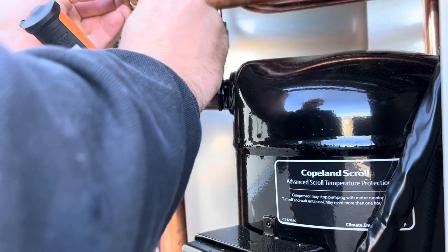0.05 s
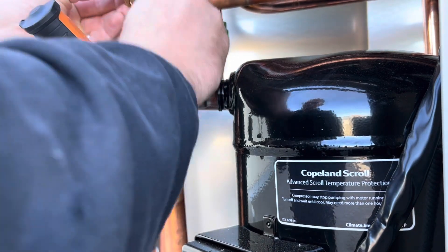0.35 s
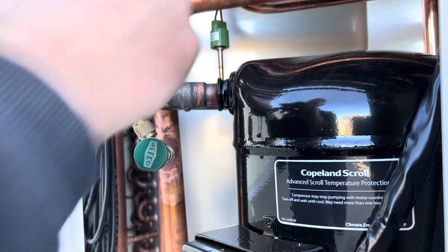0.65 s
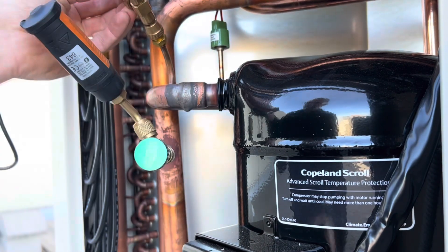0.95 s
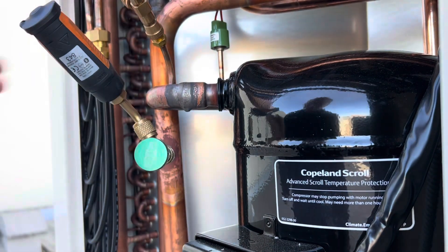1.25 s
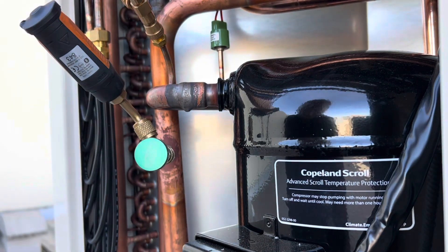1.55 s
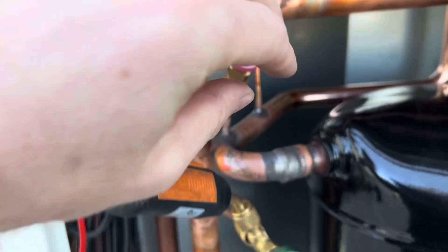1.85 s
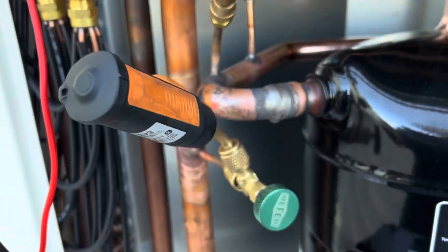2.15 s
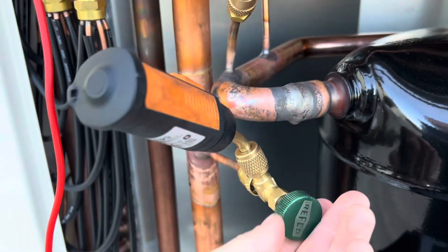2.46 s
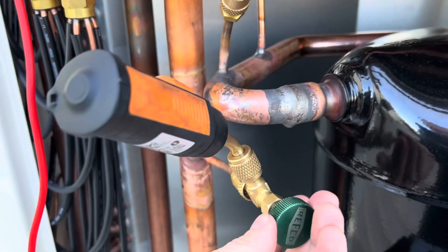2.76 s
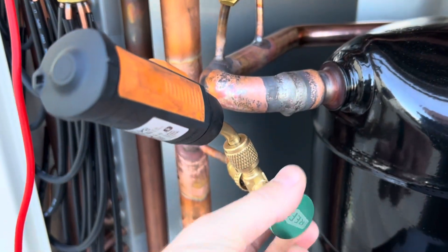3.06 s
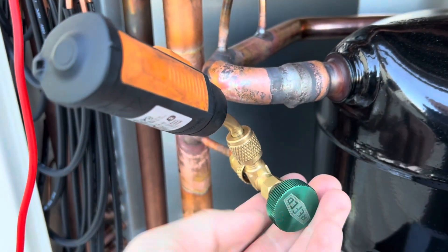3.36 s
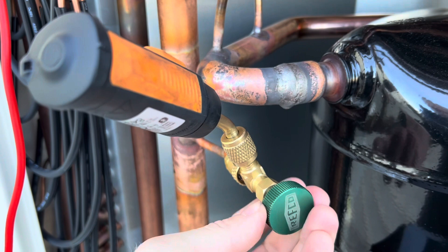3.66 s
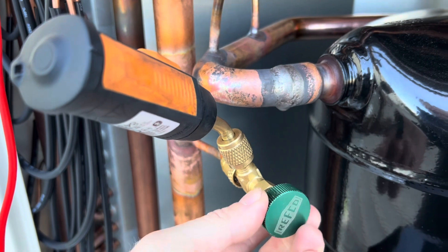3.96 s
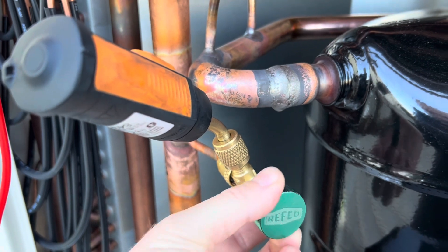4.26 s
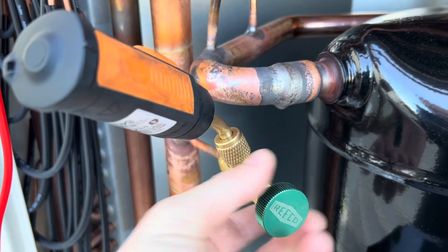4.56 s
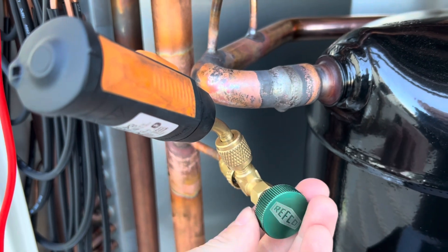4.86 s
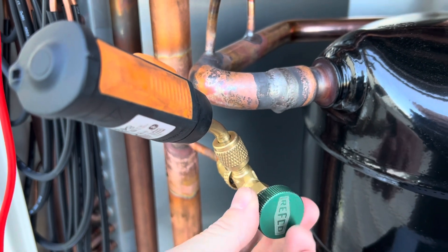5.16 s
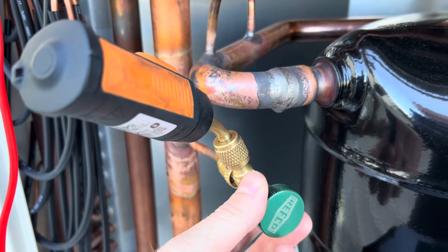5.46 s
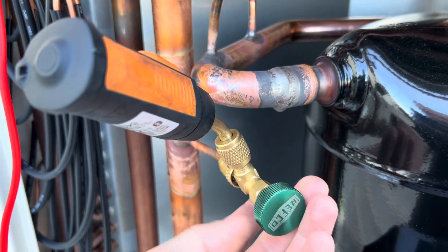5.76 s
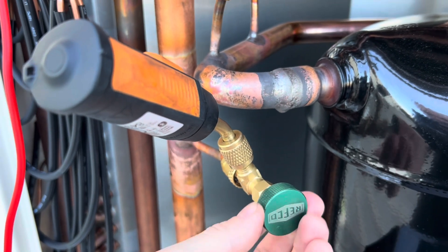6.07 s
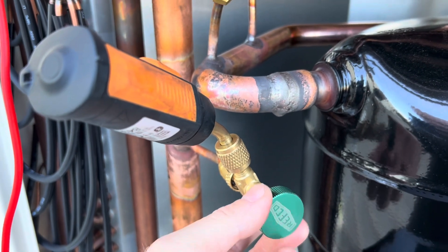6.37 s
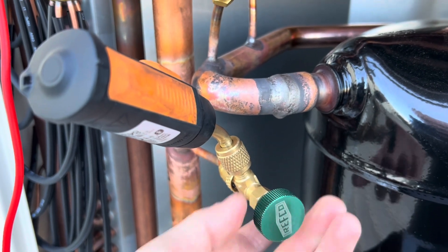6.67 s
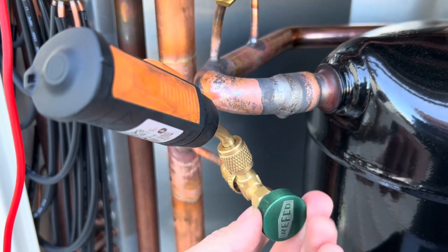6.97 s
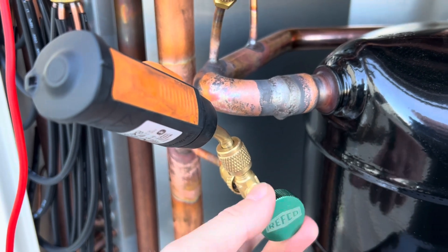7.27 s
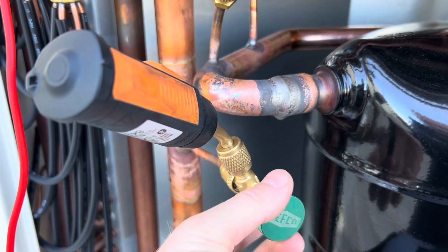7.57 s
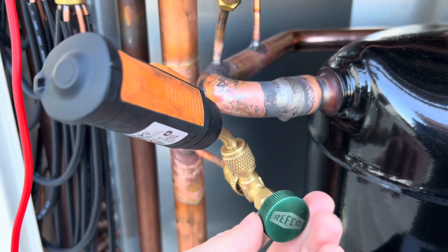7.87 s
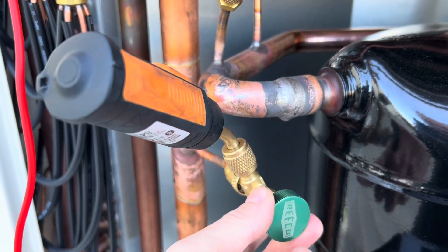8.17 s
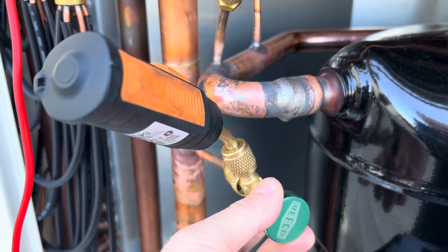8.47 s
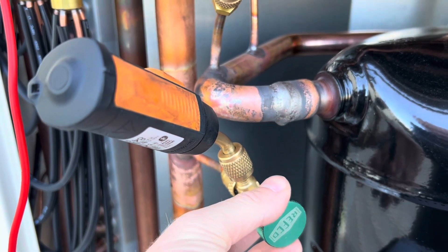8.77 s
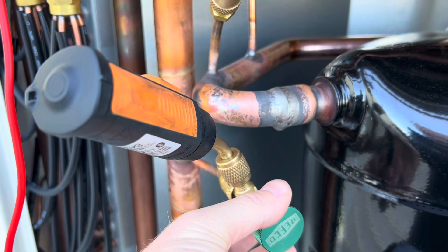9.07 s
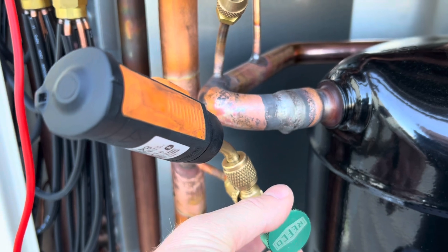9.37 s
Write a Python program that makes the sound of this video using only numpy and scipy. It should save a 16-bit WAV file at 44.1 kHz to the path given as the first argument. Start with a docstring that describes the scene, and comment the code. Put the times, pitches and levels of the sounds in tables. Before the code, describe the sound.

Steady compressor drone over rushing air, with dull handling knocks and brief squeaky hisses of gas as a valve knob is turned.

```python
"""At an open air conditioner cabinet, a scroll compressor runs steadily. Its periodic gas pulses and clacks
make a hum with one harmonic per multiple of the shaft speed, over the turbulent rush of gas and air.
The sound dips briefly and goes on from a closer spot. Hands bump about near the microphone,
and a few spurts of gas hiss and squeal out while a valve knob is screwed in."""
import sys
import numpy as np
from scipy import signal
from scipy.fft import rfft, irfft, next_fast_len
from scipy.io import wavfile

SR = 44100
rng = np.random.default_rng(int(sys.argv[2]) if len(sys.argv) > 2 else 0)


def pcm_store(signal):
    """Save signal as 16-bit PCM."""
    levels = np.round(np.clip(np.atleast_2d(signal), -1, 1) * 32767)
    wavfile.write(sys.argv[1], SR, levels.astype(np.int16).T)


N = 414981
TIME = np.arange(N) / SR
FAR, NEAR = 1, 2   # listening spots, also their columns in the level tables
MOVE_S = 1.842   # the near spot takes over
WHITE = [(100, 0), (10000, 0)]   # flat spectrum: frequency_hz, density_db
# shaft speed: time_s, turns_per_s
SHAFT_SPEED = [(0, 48.81), (1.7, 48.81), (2.2, 48.76), (9.4, 48.75)]
# phase difference between the two microphone ports: frequency_hz, left_lead_rad
PORT_LEAD = [(100, 0), (520, -.25), (720, -.8), (1050, -.6), (1400, -1.4), (1900, 0), (4650, .2),
             (5500, -1.4), (6200, -.1), (7300, 0), (9000, -2.2), (10600, -3.8), (12500, -6.28), (15500, -9)]


def compressor(turns, spot, ring_width_hz=220, sizzle_per_s=18, diffuse_hz=1600, wander=.1):
    """A periodic force gives a harmonic series; amplitude modulation makes its lines sizzle and wander."""
    # shell resonances that each clack strikes with a strength of its own: centre_hz, swing_db
    shell_rings = [(2930, 1.5), (4630, 1.1), (5800, 1.7), (6260, 2.1)]
    hz = np.arange(1, 186) * SHAFT_SPEED[-1][1]
    rings = [np.exp(-((hz - centre) / ring_width_hz) ** 4) for centre, _ in shell_rings]
    # short waves bounce about the cabinet and arrive out of step; the shell rings scatter less
    diffuse = np.minimum(hz / diffuse_hz, 1)
    scatter_rad = 1.5 * np.sqrt(hz / diffuse_hz) * diffuse ** 4 * (1 - .6 * sum(rings))
    level_db, pan_db = shell_response(hz, spot)
    lines = from_db(level_db) * np.exp(1j * pulse_and_clack(hz, scatter_rad))
    lines = stereo_lines(lines, hz, pan_db, diffuse)
    shares = rng.standard_normal((2, len(hz)))
    out = repeat(lines, turns) + throb(lines, hz, turns)
    for ring, (_, swing_db) in zip(rings, shell_rings):
        sizzle = rms_one(from_db(swing_db * drift(sizzle_per_s)))
        out += (sizzle - 1) * repeat(lines * ring, turns)
    for harmonic, change_db in line_changes(spot):
        out += (from_db(change_db) - 1) * repeat(lines * (hz == hz[harmonic - 1]), turns)
    # moving hands shift the reflections, so each high line swells and fades in its own way
    for share in shares:
        out += drift(5.9) * repeat(lines * wander * diffuse ** 2 * share, turns)
    return out


def shell_response(hz, spot, pan_spread_db=2.4):
    """Resonance favours single harmonics: the base level and left-right balance of each, in dB."""
    # low harmonics: harmonic, far_db, near_db, near_pan_db
    hum = np.array([(1, -38, -29.5, 0), (2, -41, -43, 1), (3, -35, -31, 0), (4, -46, -49, -1),
                    (5, -32, -35, 1), (6, -51, -46, 4), (7, -38, -48.5, 3), (8, -38, -36, 0),
                    (9, -43.5, -37.5, 7), (10, -36.5, -34, 1), (11, -40, -37, 1), (12, -31.5, -31, -2),
                    (13, -34, -42, 0), (14, -40, -39.5, -1), (15, -40, -41, 0), (16, -46, -43, 4),
                    (17, -51, -51, 2), (18, -52, -47, 0), (19, -42, -40, 0), (20, -54, -45, 12),
                    (21, -46, -39, 3), (22, -50, -41, 2), (23, -41, -47, 9), (24, -53, -47, 0),
                    (25, -53, -53, -5), (26, -47, -40, -1), (27, -58, -49, 0), (28, -55, -55, 3),
                    (29, -57, -48, -5), (30, -51, -40.5, -4), (31, -56, -52, -3), (32, -54, -45.5, -4)])
    # shell and pipe modes that pick out higher harmonics: frequency_hz, far_db, near_db
    modes = [(1609, -56, -57), (1657, -52, -54), (1706, -52, -60), (1755, -50, -49), (1804, -60, -53.5),
             (1901, -56, -59), (1950, -49, -55.5), (1999, -53, -58), (2048, -56, -49), (2097, -63, -53),
             (2145, -54, -66), (2194, -50, -56), (2340, -62, -54), (2389, -58, -50), (2438, -55, -55),
             (2487, -53, -49), (2536, -66, -50), (2633, -61, -55), (2731, -55, -54), (2779, -50, -54),
             (2828, -52, -61), (2877, -64, -57), (2926, -58, -44.7), (2974, -59, -54), (3023, -53, -68),
             (3072, -56, -67), (3121, -57, -61), (3218, -61, -53), (3316, -57, -65), (3364, -60, -56),
             (3511, -55, -57), (3560, -54, -60), (3998, -58, -55), (4535, -54, -58), (4583, -55, -53.5),
             (4632, -49, -49.7), (4681, -58, -56.5), (4876, -62, -55.5), (5656, -58, -53), (5705, -63, -55),
             (5754, -54, -57), (5802, -63, -55), (5851, -58, -52), (5900, -64, -53), (5949, -66, -57),
             (6193, -64, -51), (6241, -53, -47.5), (6290, -51, -52), (6339, -56, -54), (6534, -58, -63),
             (6680, -70, -57), (7119, -59, -67)]
    # spectral envelope of all other harmonics: frequency_hz, far_db, near_db
    buzz = [(1620, -60, -66), (2310, -65, -65), (2750, -62, -63), (3850, -64, -64), (4640, -63, -65),
            (5800, -70, -72), (6670, -65.5, -65.5), (8900, -72.5, -71)]
    # how unevenly the shell passes those: frequency_hz, spread_db
    unevenness = [(3000, 3.5), (6500, 4.5), (7500, 7)]
    level_db = at_hz(buzz, hz, spot) + at_hz(unevenness, hz) * rng.standard_normal(len(hz))
    pan_db = pan_spread_db * rng.standard_normal(len(hz))
    level_db[:len(hum)] = hum[:, spot]
    pan_db[:len(hum)] = hum[:, -1] / (2 if spot == FAR else 1)
    for mode in modes:
        level_db[np.argmin(abs(hz - mode[0]))] = mode[spot]
    return level_db, pan_db


def pulse_and_clack(hz, scatter_rad, clack_turns=.83, smear_rad=.42):
    """Superposition of a gas pulse and a later clack of the scrolls sets each harmonic's phase."""
    # dispersion in the shell turns the pulse into a chirp: frequency_hz, delay_s
    group_delay = [(50, .02), (430, .0195), (490, .015), (620, .0115), (700, .008), (780, .005), (1100, 0),
                   (1800, .005), (9000, .005)]
    # weight of the clack against the pulse: frequency_hz, relative_db
    clack_spectrum = [(500, -22), (720, -9), (830, 3), (1000, 13), (1250, 8), (1600, -2), (2500, -3),
                      (3500, 5), (7000, 2)]
    pulse = np.exp(-2j * np.pi * np.cumsum(at_hz(group_delay, hz)) * hz[0])
    clack = from_db(at_hz(clack_spectrum, hz)) * np.exp(-2j * np.pi * clack_turns * hz / hz[0])
    reflection_blur = np.hypot(smear_rad, scatter_rad) * rng.standard_normal(len(hz))
    return np.angle(pulse + clack) + reflection_blur


def stereo_lines(lines, hz, pan_db, diffuse, spread_rad=.89):
    """In a diffuse field each harmonic reaches the two ports with a different level and phase."""
    lead_rad = at_hz(PORT_LEAD, hz) + spread_rad * diffuse ** .25 * np.tanh(rng.standard_normal(len(hz)))
    sides = from_db(pan_db * [[1], [-1]] / 2) * ports(lead_rad)
    mid = sides.mean(0)
    return lines * sides * np.exp(-1j * np.angle(mid)) / np.maximum(abs(mid), .5)


def throb(lines, hz, turns, per_s=2.52, depth=.85, centre_hz=1520, width_hz=130, climb_hz_per_s=2000):
    """Amplitude modulation of one band, about as fast as twice the rotor's slip behind the mains."""
    phase = 2 * np.pi * per_s * (TIME - 5.06)   # from one crest
    lag = 2 * np.pi * per_s * (hz - centre_hz) / climb_hz_per_s   # each swell climbs through the band
    band = lines * depth * np.exp(-((hz - centre_hz) / width_hz) ** 2)
    in_phase, quadrature = repeat(band * np.cos(lag), turns), repeat(band * np.sin(lag), turns)
    return np.cos(phase) * in_phase + np.sin(phase) * quadrature


def line_changes(spot, shift_s=.44, fade_db_per_s=2):
    """Pairs of (harmonic, dB over time): interference shifts a few at the far spot; near by, one fades."""
    # an arm leaves the cabinet and uncovers other reflections: harmonic, start_s, change_db
    uncovered = [(12, 0.74, -4), (15, 0.77, -0.5), (14, 0.58, -8), (13, 0.94, -1), (10, 1.29, 6.5)]
    if spot == FAR:
        return [(k, db * np.clip((TIME - start) / shift_s, 0, 1)) for k, start, db in uncovered]
    return [(15, 5.5 - fade_db_per_s * (TIME - MOVE_S))]


def rush(turns, spot, pulsing_db=.24, flicker_db=1.34):
    """Turbulence in gas and air radiates broadband noise, swelling a little with each discharge."""
    # flow noise density: frequency_hz, far_db, near_db
    spectrum = [(344, -61.5, -64), (526, -71, -65.5), (750, -67, -71), (1330, -75.5, -71.5),
                (1780, -75.5, -76), (2690, -77, -75), (3730, -80.5, -80.5), (4470, -78.5, -77),
                (5130, -81.5, -75), (6100, -80.5, -79), (6860, -91, -84), (8500, -92, -85),
                (9450, -92, -90), (12870, -82, -79.5), (14300, -88, -83), (15000, -91, -99)]
    return noise(spectrum, spot) * from_db(flicker_db * drift(10.3) - pulsing_db * np.cos(2 * np.pi * turns))


def ringing_pipes(turns, gush_db=9):
    """Forced resonance: gas gushes once a turn, reaches each pipe at its own moment and keeps it ringing."""
    # pipe resonances: centre_hz, width_hz, near_db
    pipe_modes = [(1170, 10, -47), (1266, 9.2, -47.5), (1475, 88, -46.5), (1746, 8.1, -51.5),
                  (2353, 57, -52.5), (2920, 110, -49.5), (4280, 28, -52.5), (5860, 97, -59),
                  (6180, 32, -50)]
    flow = noise(WHITE)
    out = 0
    for hz, width_hz, db in pipe_modes:
        gush = from_db(gush_db * np.cos(2 * np.pi * (turns + rng.random())))
        out = out + from_db(db) * rms_one(resonate(flow * gush, hz, width_hz))
    return out


def valve(sputter_db=2, sputter_per_s=70):
    """Jet noise: gas sputters past the seal in spurts, and the seal oscillates in short, hoarse squeals."""
    # colour of the jet: frequency_hz, relative_db
    hiss = [(1200, -28), (2400, -6), (3050, 1.5), (3600, -3), (4300, 0), (5100, -2), (6150, 1),
            (6900, -4.5), (7600, -3.5), (8600, -4), (10000, -11), (11000, -11), (11750, -4), (12500, -14),
            (15000, -22)]
    # escapes of gas: start_s, length_s, roundness, level_db
    spurts = [(5.1, 0.18, 1.8, -29.5), (5.315, 0.165, 1.1, -28), (6.172, 0.187, .26, -35),
              (6.341, 0.14, .22, -33)]
    # the seal jumps between its pitches: start_s, length_s, from_hz, to_hz, level_db, width_hz
    squeals = [(5.165, .06, 4230, 4330, -30.5, 90), (5.2, .03, 6050, 6200, -34, 150),
               (5.35, .05, 6200, 6340, -30.5, 180), (5.355, .045, 4330, 4400, -33, 150),
               (5.398, .052, 4500, 4400, -28.5, 130), (5.43, .033, 4080, 4020, -34.5, 180),
               (6.182, .045, 3800, 3920, -32, 110), (6.2, .11, 4130, 4150, -36.5, 120),
               (6.2, 0.125, 3950, 3970, -37, 120), (6.337, .07, 4020, 3950, -33.5, 150),
               (6.372, 0.095, 4150, 4280, -31, 130), (7.075, .05, 4030, 4050, -42, 220)]
    jet = rms_one(noise(hiss) * from_db(sputter_db * drift(sputter_per_s)))
    out = jet * sum(from_db(db) * burst(start, length, roundness) for start, length, roundness, db in spurts)
    for start, length, from_hz, to_hz, db, width_hz in squeals:
        hoarse = drift(width_hz) + 1j * drift(width_hz)
        on = (TIME > start) & (TIME < start + length)
        swing = rms_one(abs(hoarse))[on] * np.exp(1j * np.angle(hoarse[on]))   # level and phase stagger
        cycles = np.cumsum(np.linspace(from_hz, to_hz, on.sum())) / SR
        out[:, on] += from_db(db) * burst(start, length)[on] * (swing * np.exp(2j * np.pi * cycles)).real
    return out


def knocks(rise_cycles=.44, glide=2.9, glide_s=.0037, gain_db=-5.5):
    """Each bump is a damped oscillation whose pitch sags as the contact relaxes, more so if it is hard."""
    # soft bumps of the hands: start_s, relative_db, pitch_hz
    bumps = [(0.012, -6.5, 85.5), (0.083, -7.5, 76), (.108, -9, 105), (0.14, -13, 72), (.267, -11, 75),
             (0.314, 1.5, 82), (0.346, -7.5, 78), (.423, -8, 65), (0.521, -9, 56), (0.606, -5.5, 72),
             (.76, -12, 75), (.815, -12, 90), (1.708, -8.5, 130), (1.747, -13, 75), (2.641, -13, 75),
             (3.511, -13, 69.5), (4.7, -6, 66), (5.862, -9, 62), (6.314, -5.5, 64.5), (6.711, -9.5, 73),
             (7.838, -6.5, 98), (7.892, -2.5, 72.5), (8.098, -6.5, 72), (8.436, -4.5, 100),
             (8.92, -1, 62.7), (9.041, -8.5, 60)]
    out = np.zeros(N)
    t = np.arange(SR // 5) / SR
    for start, db, hz in bumps:
        sagging_time = t + glide * from_db(db) * glide_s * (1 - np.exp(-t / glide_s))
        age = t * hz / rise_cycles
        envelope = from_db(db + gain_db) * age * np.exp(1 - age)
        part = out[int(start * SR):][:len(t)]
        part += (envelope * np.sin(2 * np.pi * hz * sagging_time))[:len(part)]
    return out


def handling(far_draught_db=-33, near_draught_db=-28, lumpy_db=.5, scuff_hz=200, scuff_width_hz=170):
    """A draught's turbulence rumbles on the microphone; each grip adds rumble and the friction of skin."""
    # the hand shifts its grip on the case: start_s, length_s, rumble_db, scuff_db
    grips = [(-0.1, 0.99, -22, -39), (1.04, 0.21, -35, -32.5), (1.54, 0.11, -40, -31.5),
             (1.682, 0.13, -26.5, -27), (2.55, 0.3, -36, -39), (3.062, 0.1, -37, -31),
             (5.76, 0.13, -26.5, -34), (6.255, 0.16, -37, -37), (6.6, 0.22, -24.5, -43),
             (7.15, 0.35, -29, -51), (7.73, 0.22, -23, -30), (8.367, 0.37, -24.5, -40),
             (8.818, 0.17, -21, -32), (8.996, 0.4, -29, -39)]
    # colour of the rumble: frequency_hz, relative_db
    rumble_spectrum = [(20, -30), (35, -11), (52, 8), (78, 4.5), (105, 1), (145, -2), (200, -14),
                       (300, -39), (450, -53), (900, -84)]
    power = from_db(np.where(TIME < MOVE_S, far_draught_db, near_draught_db)) ** 2
    rubbing = 0
    for start, length, rumble_db, scuff_db in grips:
        swell = burst(start, length)
        power += (from_db(rumble_db) * swell) ** 2
        rubbing += from_db(scuff_db) * swell
    rumble = rms_one(noise(rumble_spectrum)) * from_db(lumpy_db * drift(12))
    scuff = resonate(noise(WHITE), scuff_hz, scuff_width_hz)
    scuff = rms_one(resonate(scuff, scuff_hz, scuff_width_hz))
    return np.sqrt(power) * rumble + rubbing * scuff


def singing(spot, waver_db=1.5, waver_rad=.5):
    """Thin metallic tones waver under slight random modulation of amplitude and phase."""
    # tones between the shaft's harmonics: pitch_hz, far_db, near_db
    tones = [(2232, -58, -58), (2268, -52, -55), (2331, -54, -51), (2430, -48, -49.5)]
    out = 0
    for tone in tones:
        amplitude = np.sqrt(2) * from_db(tone[spot] + waver_db * drift(7))
        out += amplitude * np.sin(2 * np.pi * tone[0] * TIME + waver_rad * drift(4.4))
    return out


def whine(mains_hz=50):
    """Magnetic forces vibrate the motor at steady harmonics of the mains."""
    # motor tones: mains_harmonic, level_db
    tones = [(2, -51), (6, -54.5), (12, -51.5), (14, -51)]
    return sum(from_db(db) * np.sqrt(2) * np.sin(2 * np.pi * (k * mains_hz * TIME + rng.random()))
               for k, db in tones)


def from_db(db):
    """Decibels to amplitude ratio."""
    return 10 ** (np.asarray(db) / 20)


def rms_one(x):
    """Normalise to rms 1."""
    return x / np.sqrt(np.mean(x ** 2) + 1e-20)


def at_hz(rows, hz, column=1):
    """Interpolate one column of a spectrum on a log-frequency axis."""
    rows = np.array(rows)
    return np.interp(np.log(np.maximum(hz, 1)), np.log(rows[:, 0]), rows[:, column])


def drift(rate_hz):
    """Low-pass noise: a slow random fluctuation of rms 1."""
    step, settle = 40, 2000
    pole = np.exp(-2 * np.pi * step * rate_hz / SR)
    white = rng.standard_normal(N // step + settle + 2)
    slow = signal.lfilter([1], [1, -2 * pole, pole * pole], white)[settle:]
    return np.interp(np.arange(N) / step, np.arange(len(slow)), rms_one(slow))


def burst(start, length, roundness=.27):
    """An envelope from nothing to one and back; roundness near 0 is square, 1 is a smooth arch."""
    along = np.clip((TIME - start) / length, 0, 1)
    return (4 * along * (1 - along)) ** roundness


def ports(lead_rad):
    """Complex left and right gains with the given phase difference."""
    return np.exp(1j * lead_rad / 2 * [[1], [-1]])


def noise(spectrum, column=1):
    """Noise of the given spectral density in dB, partly coherent between the two microphone ports."""
    # likeness of left and right: frequency_hz, coherence
    coherence = [(50, .9), (140, .8), (300, .76), (700, .7), (1500, .55), (3000, .5), (5500, .4),
                 (7000, .8), (9500, .99), (15000, .88)]
    size = next_fast_len(N)
    hz = np.arange(size // 2 + 1) * SR / size
    alike = at_hz(coherence, hz)
    mid, side = rfft(rng.standard_normal((2, size)))
    both = (mid + np.sqrt((1 - alike) / (1 + alike)) * side * [[1], [-1]]) * ports(at_hz(PORT_LEAD, hz))
    return irfft(both * from_db(at_hz(spectrum, hz, column)) * np.sqrt(SR / 2), size)[:, :N]


def resonate(x, hz, width_hz):
    """A second-order resonator with gain 1 at its peak."""
    r = np.exp(-np.pi * width_hz / SR)
    feedback = [1, -2 * r * np.cos(2 * np.pi * hz / SR), r * r]
    return signal.lfilter(np.array([1, 0, -1]) * (1 - r * r) / 2, feedback, x)


def repeat(lines, turns, size=8192):
    """Fourier synthesis: each side's harmonics sum to one period, repeated with every shaft turn."""
    cycles = irfft(np.pad(lines, ((0, 0), (1, 0))), size) * size / np.sqrt(2)
    return np.array([np.interp(turns % 1 * size, np.arange(size + 1), np.r_[c, c[0]]) for c in cycles])


def scene(shake_turns=.0001, far_pipes_db=-11, dip_s=.035):
    """The sources superpose: the machine from the far spot, a brief dip in level, then from near by."""
    turns_per_s = np.interp(TIME, *np.transpose(SHAFT_SPEED))
    turns = np.cumsum(turns_per_s) / SR + shake_turns * drift(9)
    pipes = ringing_pipes(turns)
    far = compressor(turns, FAR) + rush(turns, FAR) + singing(FAR) + from_db(far_pipes_db) * pipes
    near = compressor(turns, NEAR) + rush(turns, NEAR) + singing(NEAR) + pipes
    dip = np.minimum(abs(TIME - MOVE_S) / dip_s, 1)
    return dip * (np.where(TIME < MOVE_S, far, near) + whine() + handling() + knocks() + valve())


def record(dry, low_cut_hz=30, high_cut_hz=15100):
    """Band limiting: the microphone drops the deepest bass, and the top is cut steeply."""
    sound = signal.sosfilt(signal.butter(4, low_cut_hz, "high", fs=SR, output="sos"), dry)
    return signal.sosfilt(signal.ellip(10, .1, 80, high_cut_hz, fs=SR, output="sos"), sound)


dry = scene()
out = record(dry)
pcm_store(out)
```